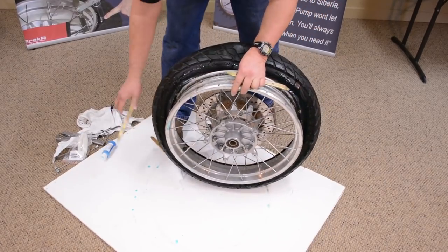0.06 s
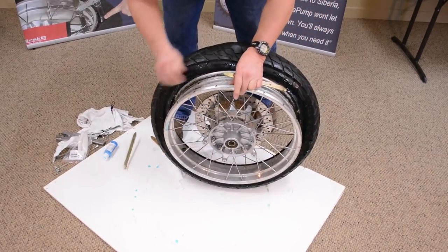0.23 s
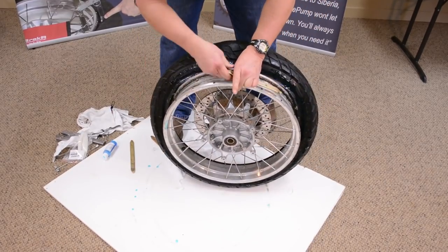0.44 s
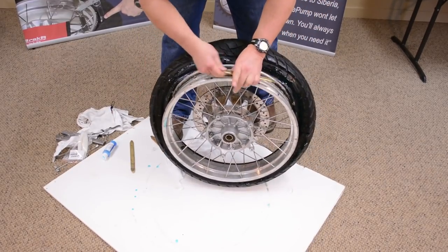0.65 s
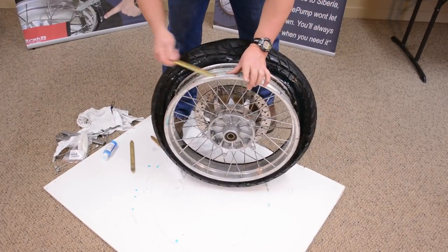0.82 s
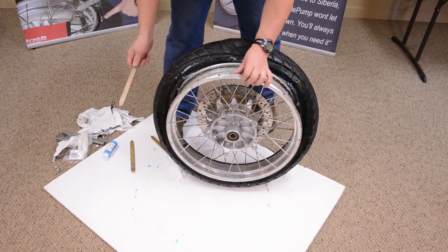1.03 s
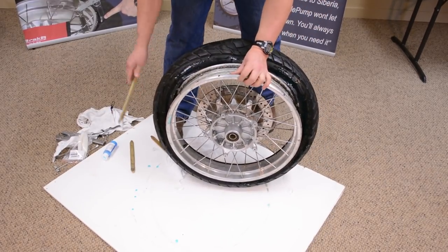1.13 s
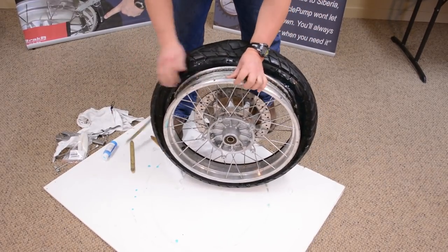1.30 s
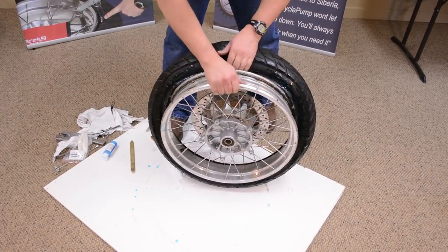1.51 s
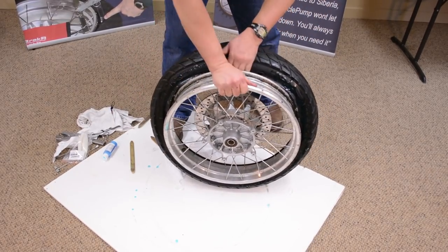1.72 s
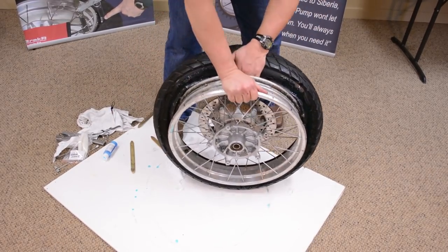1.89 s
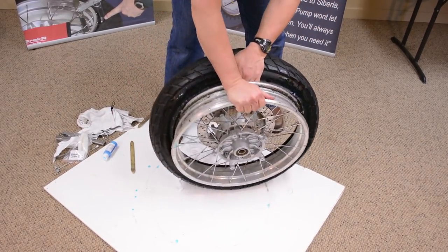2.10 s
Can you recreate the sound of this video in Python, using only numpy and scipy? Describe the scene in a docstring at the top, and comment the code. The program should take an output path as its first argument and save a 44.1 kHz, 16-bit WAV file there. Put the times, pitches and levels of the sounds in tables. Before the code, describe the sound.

Two steel tire irons clatter onto a board, one after the other, bouncing and ringing thinly.

```python
"""Two steel tire irons are tossed onto a board on the carpet beside a wheel, in a small quiet room.
At 0.2 s the first lands end first, bounces from tip to tip and rattles to rest: the board thumps and
clacks, the steel ticks and rings thinly. At 1.3 s the second does the same, with light pings of steel
on steel. From 1.7 s hands brush the tire. Throughout, the room answers over ventilation rumble and
hiss, and the hardest blows overload the microphone."""
import sys
import numpy as np
from scipy import signal
from scipy.fft import rfft, irfft
from scipy.io import wavfile

SR = 44100
rng = np.random.default_rng(int(sys.argv[2]) if len(sys.argv) > 2 else 0)


def put_to_file(sound):
    """Save the sound as 16-bit audio at rate SR, in the file named by the first command-line argument."""
    columns = np.atleast_2d(sound).T  # one column per channel
    safe = np.clip(columns, -1, 1)
    whole_steps = np.round(safe * 32767)
    wavfile.write(sys.argv[1], SR, whole_steps.astype(np.int16))


N = 94815

THUMP_DB, THUMP_T60_S, THUMP_RISE_S, THUMP_LOW_CUT_HZ = 2.5, 0.03, 0.00086, 119
CLACK_DB, CHATTER_GAIN = 14, 0.19
TICK_DB, GRIT_T60_S, GRIT_GAIN = 2.5, 0.01, 0.28
# Each row: board mode in Hz, level in dB relative to the thump, T60 in seconds.
BOARD_MODES = [(139, -34, 0.13), (202, -24.5, .13), (275.5, -24, .12), (404.3, -21, 0.072),
               (534, -25.5, 0.02), (635, -24.5, 0.1)]
# Each row: frequency in Hz, relative level in dB.
CLACK_SPECTRUM = [(60, -26.5), (200, 2), (450, 12.5), (650, 5), (950, 2.5), (1300, 2), (1750, -8),
                  (2450, -10), (3100, -16.5), (3600, -18.5), (7000, -34), (16000, -74)]
TICK_SPECTRUM = [(300, -74), (2000, -19), (3200, -18), (4300, -3.5), (5600, 6), (7000, 1.5), (8100, -5),
                 (9300, -3.5), (10800, -6), (13000, -20.5), (16000, -36)]
# Each row: start in seconds, thump gain in dB, thump pitch in Hz, clack gain in dB, tick gain in dB,
# chatter decay in seconds (short on a tip, long when the iron lands flat).
BLOWS = [(.2214, 6, 230, 1.5, -2.5, 0.00023), (0.2533, 8, 327, 4.5, 0, 0.00088),
         (0.2668, -7, 305, -12, -29, 0.0015), (0.3395, -2, 231, -32, -36, 0.0033),
         (0.362, -6.5, 290, -8.5, -16, 0.0021), (.4170, 4, 219, -5, -6.5, 0.0018),
         (.4260, 3, 356, -1, 2, 0.00044), (0.5279, 0.5, 250, 0, -11.5, 0.00088),
         (0.5714, -3, 313, -15, -22.5, 0.009), (0.594, -14, 276, -16, -26, 0.0059),
         (0.607, -17.5, 235, -26, -36, 0.0051), (1.3180, 2, 326, 8, 5, 0.0012),
         (1.3726, -12, 306, -22, -7, 0.015), (1.4115, -34, 413, -4, -11, 0.022),
         (1.4272, 1, 269, -2.5, -7.5, 0.001), (1.4317, -38, 380, -6, -11.5, 0.0052),
         (1.5137, -10, 293, -7, -15, 0.015), (1.556, -12, 275, -19, -19.5, 0.011),
         (1.5780, -0.5, 245, -15, -12, 0.0085), (1.584, -7.5, 346, -5.5, -13.5, 0.012),
         (1.6111, -2, 310, -11, -11, 0.017), (1.6215, -3.5, 313, -6, -26, 0.0062),
         (1.667, -6.5, 259, -10.5, -11, 0.0033), (1.6812, -8, 324, -16.5, -14, .008),
         (1.699, -15.5, 328, -17, -24, 0.002), (1.7102, -19, 248, -28, -41, 0.0047),
         (1.7332, -8.5, 277, -17, -19.5, 0.0055), (1.7499, -6.5, 287, -40, -20.5, 0.0047),
         (1.7560, -11.5, 443, -20, -24, 0.011), (1.767, -29, 290, -41, -20, 0.0031),
         (1.8041, -11, 266, -19, -19.5, 0.012), (1.833, -16, 277, -26.5, -27.5, 0.0063),
         (1.8500, -35, 256, -27, -26, 0.017)]


def knocks():
    """Each blow thumps the board, together with a clack and a steel tick, both smeared by chatter."""
    out = np.zeros(N)
    clack_click, tick_click = click(CLACK_SPECTRUM), click(TICK_SPECTRUM)
    t = np.arange(SR // 5) / SR
    impulse = t == 0
    board = sum(amp(db - 60 * t / t60) * np.sin(2 * np.pi * hz * t) for hz, db, t60 in BOARD_MODES)
    onset = 1 - np.exp(-t / THUMP_RISE_S)
    low_cut = signal.butter(1, THUMP_LOW_CUT_HZ, "high", fs=SR)
    for start_s, thump_db, thump_hz, clack_db, tick_db, chatter_s in BLOWS:
        push = np.sin(2 * np.pi * thump_hz * t) * amp(-60 * t / THUMP_T60_S)
        thump = signal.lfilter(*low_cut, (push + board) * onset)
        grit, chatter = rng.standard_normal((2, len(t)))
        contact = unit(impulse + CHATTER_GAIN * chatter * np.exp(-t / chatter_s))
        gritty_hit = impulse + GRIT_GAIN * grit * amp(-60 * t / GRIT_T60_S)
        steel = unit(signal.fftconvolve(gritty_hit, tick_click))
        clack = unit(signal.fftconvolve(contact, clack_click))
        tick = unit(signal.fftconvolve(contact, steel))
        add(out, start_s, amp(THUMP_DB + thump_db) * thump)
        add(out, start_s, -amp(CLACK_DB + clack_db) * clack)
        add(out, start_s, -amp(TICK_DB + tick_db) * tick)
    return out


def bar_ring(modes, rise_s, free_s, damped_t60_s=.07):
    """A steel bar rings freely for free_s, then is damped."""
    t = np.arange(SR * 3 // 4) / SR
    onset = 1 - np.exp(-t / rise_s)
    damping = amp(-60 * np.maximum(t - free_s, 0) / damped_t60_s)
    partials = sum(amp(db - 60 * t / t60) * np.sin(2 * np.pi * (hz * t + rng.random()))
                   for hz, db, t60 in modes)
    return onset * damping * partials


# Each row: mode in Hz, relative level in dB, T60 in seconds.
FIRST_IRON_MODES = [(3273, -7.5, .45), (5330, -.5, 1.4), (7806, -8.5, .6), (10660, -14, .4)]
SECOND_IRON_MODES = [(4000, 10, .014), (4300, 12, .016), (4581, -10, .3), (5523, -5, .35), (5600, 16, .018),
                     (5690, -5, .35), (5830, -8, .3), (6140, -7, .35), (6885, -11, .17), (7990, -17, .5),
                     (9330, 1, .04)]
# Each row: start in seconds, gain in dB, rise in seconds, free ringing in seconds.
FIRST_IRON_RINGS = [(.2535, -36, .004, .068), (.3350, -36, .008, .036), (.3870, -33.5, .016, .03),
                    (.4400, -40.5, .012, .088)]
SECOND_IRON_RINGS = [(1.317, -25, 0.00076, .08), (1.4272, -62, .001, .1), (1.592, -41, 0.0068, 0.023),
                     (1.6678, -60, 0.0012, .03)]


def irons():
    """Each iron rings thinly after a blow, or as it spins its flat side outward."""
    out = np.zeros(N)
    for modes, rings in (FIRST_IRON_MODES, FIRST_IRON_RINGS), (SECOND_IRON_MODES, SECOND_IRON_RINGS):
        for start_s, db, rise_s, free_s in rings:
            add(out, start_s, amp(db) * bar_ring(modes, rise_s, free_s))
    return out


# Each row: start in seconds, level in dB, rise in seconds, T60 in seconds.
STEEL_PINGS = [(1.474, -31.5, .011, .22), (1.5405, -33, .001, .1), (1.5405, -51, .004, 2.0)]


def pings(hz=3346):
    """Light touches of steel on steel ring a single mode."""
    out = np.zeros(N)
    for start_s, db, rise_s, t60 in STEEL_PINGS:
        add(out, start_s, amp(db) * bar_ring([(hz, 0, t60)], rise_s, free_s=t60))
    return out


# Each row: frequency in Hz, relative level in dB.
BRUSH_SPECTRUM = [(100, -8), (400, 12.5), (900, 2), (1650, 7), (2400, 4.5), (6000, -12), (15000, -20)]
# Each row: start in seconds, gain in dB, length in seconds.
BRUSH_STROKES = [(1.699, -42.5, 0.11), (1.859, -49.5, 0.099)]


def hands():
    """Skin slides over the tire's rubber in a soft, grainy swish."""
    out = np.zeros(N)
    for start_s, db, length_s in BRUSH_STROKES:
        grains = rng.laplace(size=int(length_s * SR))
        stroke = grains * np.hanning(len(grains)) ** .5
        add(out, start_s, amp(db) * signal.fftconvolve(stroke, click(BRUSH_SPECTRUM)))
    return out


# Each row: frequency in Hz, reverberation gain in dB.
ROOM_SPECTRUM = [(60, -39.5), (130, 21), (200, -4), (320, -9), (600, -7.5), (1200, -7), (2500, -10),
                 (4000, -5.5), (5800, -1.5), (8000, -9), (11000, -8), (16000, -25)]
# Each row: frequency in Hz, T60 in seconds.
ROOM_DECAY = [(80, .45), (200, .33), (400, .31), (1200, .38), (3000, .35), (6000, .4), (12000, .25)]


def room_tail(delay_s=0.0017, build_s=0.0028, size=512):
    """Dense reflections build up, then each band dies at its own rate."""
    hz, t, bands = signal.stft(rng.standard_normal(SR * 3 // 4), SR, nperseg=size)
    bands *= amp(-60 * t / curve_at(ROOM_DECAY, hz)[:, None])
    band_energy = np.sum(abs(bands) ** 2, 1, keepdims=True)
    bands *= amp(curve_at(ROOM_SPECTRUM, hz))[:, None] / np.sqrt(band_energy)
    tail = signal.istft(bands, SR, nperseg=size)[1] * np.sqrt(3) / size
    elapsed_s = np.maximum(np.arange(len(tail)) / SR - delay_s, 0)
    return tail * (1 - np.exp(-elapsed_s / build_s))


def room(sound, tails=3, fades_per_s=7):
    """The reflections change as the irons skip about: a steady crossfade between tails."""
    out = np.zeros(N)
    turn = np.arange(N) / SR * fades_per_s
    for k in range(tails):
        triangle = np.maximum(1 - abs((turn + k) % tails - 1), 0)
        out += signal.fftconvolve(sound * np.sin(np.pi / 2 * triangle), room_tail())[:N]
    return out


# Each row: frequency in Hz, relative spectral density in dB.
BACKGROUND_SPECTRUM = [(12, -61), (20, -10.5), (65, 0), (167, -9), (203, -3.5), (397, -11), (443, -11),
                       (482, -12), (539, -12), (1840, -24), (15800, -27.5)]
# Each row: frequency in Hz, left-right correlation from 0 to 1.
BACKGROUND_CORRELATION = [(50, 1), (1000, .99), (3000, 0.89), (6000, 0.81), (10000, 0.57), (15000, 0.54)]


def rumble_and_hiss(rms_db=-43.5):
    """Ventilation rumble common to both channels, and microphone hiss that is partly separate."""
    hz = np.fft.rfftfreq(N, 1 / SR)
    mid, side = rfft(rng.standard_normal((2, N))) * amp(curve_at(BACKGROUND_SPECTRUM, hz))
    correlation = curve_at(BACKGROUND_CORRELATION, hz)
    mid *= np.sqrt(1 + correlation)
    side *= np.sqrt(1 - correlation)
    stereo = irfft(np.array([mid + side, mid - side]), N)
    return amp(rms_db) * stereo / stereo.std()


def amp(db):
    return 10 ** (np.asarray(db) / 20)


def curve_at(points, hz):
    """Interpolates on a log-frequency axis."""
    point_hz, values = np.transpose(points)
    return np.interp(np.log(hz + 1), np.log(point_hz + 1), values)


def unit(sound):
    """Scales to energy 1."""
    return sound / np.sqrt(np.sum(sound ** 2) + 1e-20)


def add(mix, start_s, sound):
    part = mix[round(start_s * SR):][:len(sound)]
    part += sound[:len(part)]


def click(spectrum, size=4096):
    """Minimum-phase click with the given spectrum."""
    hz = abs(np.fft.fftfreq(size, 1 / SR))
    log_gain = np.log(amp(curve_at(spectrum, hz)))
    response = np.exp(np.conj(signal.hilbert(log_gain)))
    return unit(np.fft.ifft(response).real[:size // 2])


def scene():
    """Blows and ringing steel with their reflections, over hands and background noise."""
    blows = knocks()
    steel = irons() + pings()
    reflections = room(blows + amp(-13) * steel)
    return blows + steel + reflections + hands() + rumble_and_hiss()


def record(dry, threshold_db=-16, slope=0.48, fall_db_per_s=29.5, cutoff_hz=16000):
    """A limiter ducks briefly after the hardest blows; the peaks clip, then a low-pass follows."""
    power = signal.lfilter(np.ones(200) / 200, 1, (dry ** 2).mean(0))
    fall_db = np.arange(N) / SR * fall_db_per_s
    held_db = np.maximum.accumulate(10 * np.log10(power + 1e-12) + fall_db) - fall_db
    over_db = np.maximum(held_db - threshold_db, 0)
    clipped = np.clip(dry * amp(-slope * over_db), -1, 1)
    low_pass = signal.firwin(511, cutoff_hz, window=("kaiser", 9), fs=SR)
    return signal.oaconvolve(clipped, low_pass[None], "same")


dry = scene()
out = record(dry)
put_to_file(out)
```